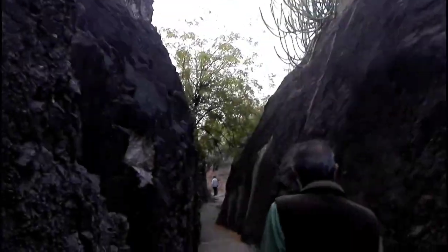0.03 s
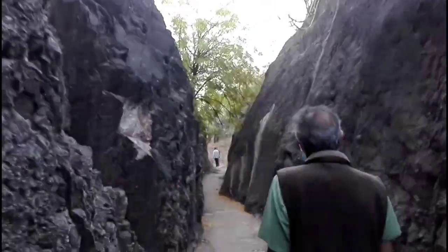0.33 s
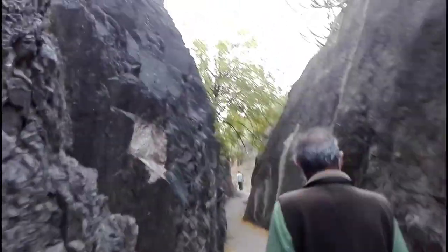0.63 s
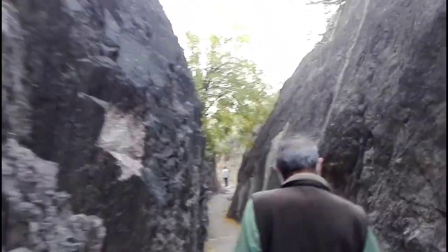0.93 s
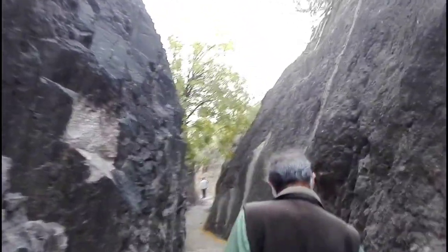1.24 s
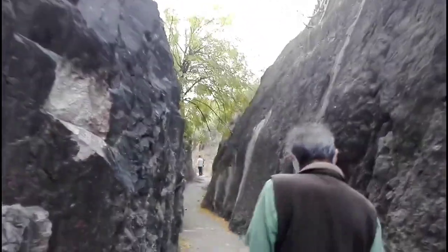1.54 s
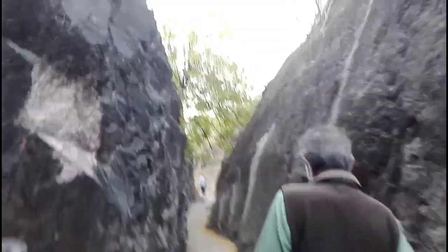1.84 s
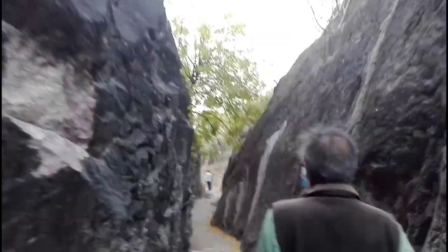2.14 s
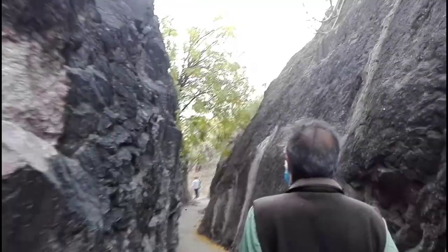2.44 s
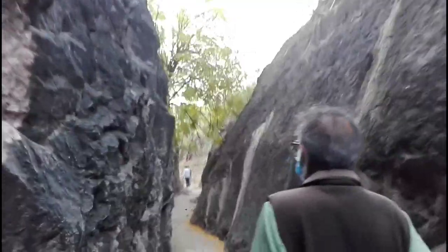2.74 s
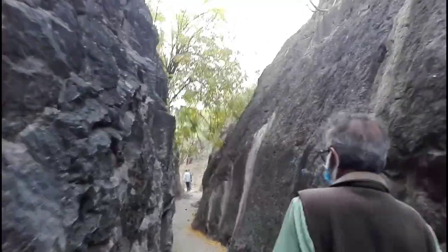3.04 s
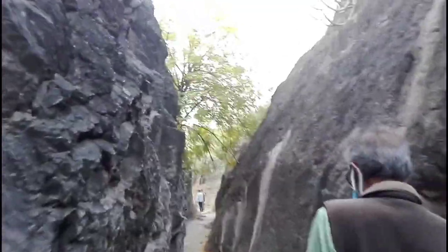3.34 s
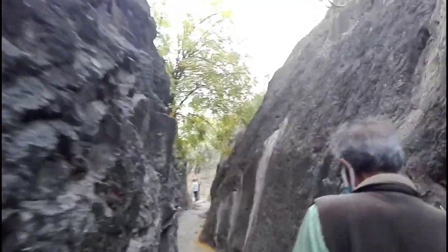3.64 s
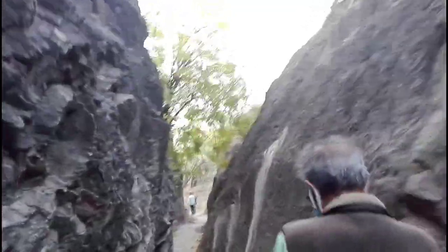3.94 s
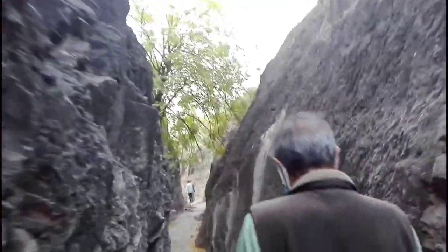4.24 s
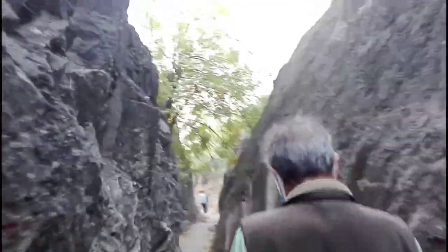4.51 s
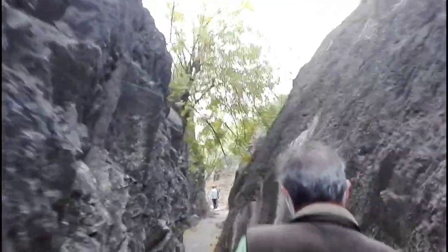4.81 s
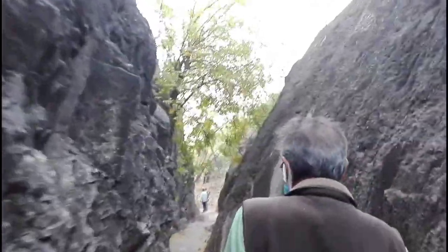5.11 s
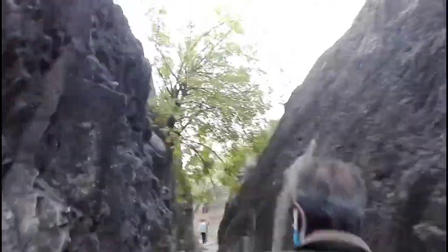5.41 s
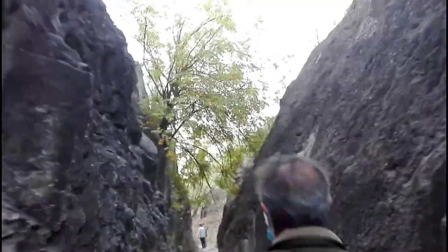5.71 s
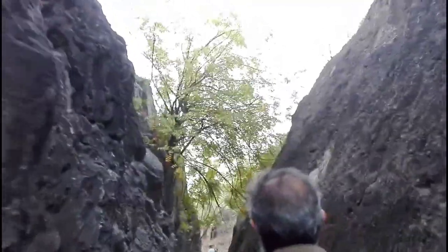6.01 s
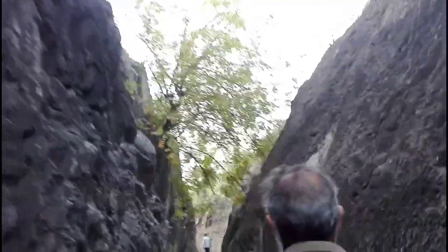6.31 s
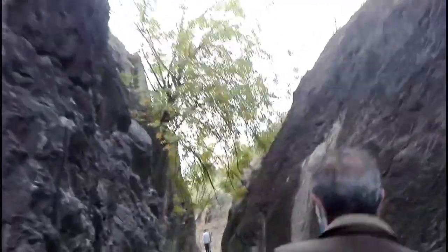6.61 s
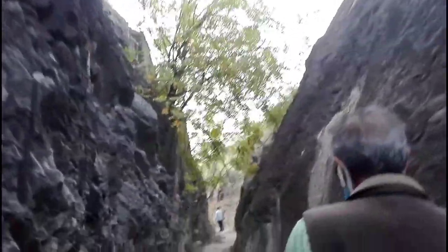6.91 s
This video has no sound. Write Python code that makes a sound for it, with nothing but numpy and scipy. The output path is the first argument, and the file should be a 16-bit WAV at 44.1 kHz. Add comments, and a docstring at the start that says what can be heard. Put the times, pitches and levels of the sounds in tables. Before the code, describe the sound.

A small bird repeats a high, slightly raspy three-note phrase between rock walls, over soft footsteps and one sharp knock on the microphone.

```python
"""A small bird repeats a three-note phrase in a narrow rock cleft: slurred whistle, falling chip,
two-voiced chirp. Its syrinx makes gliding tones that rasp where it vibrates unevenly, and the close
walls smear every note. Someone walks through with a camera: soft steps, crunching grit and, right at
the microphone, small handling ticks and one sharp knock on the housing.
Under it all lie a faint rumble of air and a distant hush."""
import sys
import numpy as np
from scipy import signal
from scipy.fft import rfft, irfft, next_fast_len
from scipy.io import wavfile
from scipy.ndimage import map_coordinates

SR = 44100
rng = np.random.default_rng(int(sys.argv[2]) if len(sys.argv) > 2 else 0)


def digitize_waveform(pressure):
    """Quantize a signal to 16-bit integers and store it at the path in sys.argv[1].

    Rows of a 2-D input are taken as channels; values are limited to [-1, 1].
    """
    field = np.atleast_2d(pressure).T
    bounded = np.clip(field, -1, 1)
    quanta = np.round(bounded * 32767).astype(np.int16)
    wavfile.write(sys.argv[1], SR, quanta)


N = 306747

# rasp spectrum of the chips and the opening call: f/Hz, relative density/dB
CHIP_RASP = [(700, -7.5), (1200, -17), (1800, 6.5), (2500, 7.5), (3200, 16), (3600, 5.5), (4200, -0.5),
             (5500, -37), (7000, -8.5), (8200, -56), (14000, -55.5)]
SLIDE_HZ, SLIDE_CURVE = 736, 1.45  # whistles and opening call end in a fall that gathers speed


def amp(db):
    """Decibels to gain."""
    return 10 ** (np.asarray(db) / 20)


def unit(x):
    """Scale to rms 1."""
    return x / np.sqrt(np.mean(x ** 2) + 1e-20)


def with_level(x, db, span):
    """Scale a sound so that its energy equals db held for span seconds."""
    return amp(db) * x / np.sqrt(np.sum(x ** 2) / (span * SR))


def along(points, hz):
    """Read (f/Hz, value) points on a log frequency axis."""
    f, values = np.transpose(points)
    return np.interp(np.log(hz + 1), np.log(f + 1), values)


def wobble(rate, size):
    """A smooth random curve, rate knots a second."""
    knots = rng.standard_normal(int(size * rate / SR) + 4)
    return map_coordinates(knots, [np.arange(size) * rate / SR])


def noise(spectrum, size):
    """Noise of rms 1, coloured by (f/Hz, relative density/dB) points."""
    m = next_fast_len(size)
    colour = amp(along(spectrum, np.fft.rfftfreq(m, 1 / SR)))
    return unit(irfft(rfft(rng.standard_normal(m)) * colour, m)[:size])


def add(track, s, sound):
    """Mix a sound into the track at s seconds."""
    part = track[max(round(s * SR), 0):][:len(sound)]
    part += sound[:len(part)]


def burst(t, attack, t60):
    """A quick rise and an exponential fall."""
    return (1 - np.exp(-t / attack)) * 1000 ** (-t / t60)


def bump(t, at, width):
    """A bell of height 1 around a moment."""
    return np.exp(-((t - at) / width) ** 2)


def swell(t, start, hold, attack, release):
    """A level in dB, 0 while held from start; attack and release are seconds per 20 dB."""
    return -20 * (np.maximum(start - t, 0) / attack + np.maximum(t - start - hold, 0) / release)


def switch(t, width):
    """A smooth change from 0 to 1 around t = 0."""
    return .5 + .5 * np.tanh(t / width)


def air(puff_width_s=.046, hiss_db=-76):
    """Air brushes the microphone in puffs, over a distant outdoor hush and a steady hiss."""
    # course of the rumble and of the hush: t/s, level/dB
    rumble_levels = [(0, -56.5), (3.5, -53), (5.3, -49.5), (6.3, -52.5), (6.96, -54)]
    hush_levels = [(0, -69.5), (1, -69), (2.5, -68), (5, -66), (6.3, -71), (6.96, -67)]
    # their spectra: f/Hz, relative density/dB
    rumble_spectrum = [(12, 2), (30, 0.5), (50, -5.5), (90, -13.5), (140, -21.5), (220, -41), (500, -68.5),
                       (1500, -92.5)]
    hush_spectrum = [(100, -0.5), (180, -5), (330, -9), (550, -17.5), (750, -16.5), (1100, -8.5),
                     (1500, -9.5), (1900, -18.5), (3000, -20.5), (14000, -43.5)]
    # puffs of air: t/s, lift of the rumble/dB
    puffs = [(.77, 11.5), (1.35, 7), (2.75, 6.5), (4.088, 12.5), (4.45, 6.5), (5.17, 1.5), (5.38, 5),
             (5.85, 6)]
    t = np.arange(N) / SR
    rumble_db = np.interp(t, *np.transpose(rumble_levels))
    hush_db = np.interp(t, *np.transpose(hush_levels))
    puff_db = sum(db * bump(t, s, puff_width_s) for s, db in puffs)
    rumble = amp(rumble_db + puff_db) * noise(rumble_spectrum, N)
    hush = amp(hush_db + 1.5 * wobble(18, N)) * noise(hush_spectrum, N)
    hiss = amp(hiss_db) * noise([(100, .47), (3000, .26), (7000, -.75), (14000, -1.1)], N)
    return rumble + hush + hiss


def cleft(x, wet_db, build_s=.0096, echoes_db=-3):
    """Direct sound, eight echoes off the close walls and a diffuse tail, new at each spot on the path."""
    # reverberation between the rock walls: f/Hz, t60/s
    decay_times = [(200, 0.38), (1500, 0.36), (2600, 0.33), (5300, 0.29), (8000, 0.28), (13000, 0.5)]
    hz, t, spectra = signal.stft(rng.standard_normal(SR // 2), SR, nperseg=256)
    envelope = burst(t, build_s, along(decay_times, hz)[:, None])
    _, tail = signal.istft(spectra * envelope, SR, nperseg=256)
    response = tail / np.linalg.norm(tail)
    delays = (rng.uniform(.003, .025, size=8) * SR).astype(int)
    response[delays] += amp(echoes_db) * rng.standard_normal(len(delays)) / np.sqrt(len(delays))
    response *= amp(wet_db)
    response[0] = 1  # the direct path
    return signal.fftconvolve(x, response)


def handling_ticks():
    """The camera housing ticks in the hand, right at the microphone: a snap with a faint tail."""
    # ticks: t/s, peak level/dB
    ticks = [(0.989, -40), (1.001, -41.5), (1.622, -39), (1.634, -39), (2.206, -31.5), (2.218, -37),
             (2.323, -29), (2.326, -24.5), (2.864, -37.5)]
    # colour of the housing: f/Hz, relative density/dB
    housing = [(150, -5.5), (600, -27.5), (1000, -4), (1500, 5), (2200, -0.5), (2800, -9.5), (4000, -13.5),
               (5500, -22.5), (9000, -57), (14000, -53)]
    out, t = np.zeros(N), np.arange(SR // 8) / SR
    envelope = burst(t, .0001, .007) + amp(-21) * burst(t, .002, .05)
    for s, db in ticks:
        tick = noise(housing, len(t)) * envelope
        add(out, s, amp(db) * tick / np.abs(tick).max())
    return out


def knock(at_s=2.3229, push_hz=88, settle_hz=42):
    """A knock on the housing gives the microphone one deep push, rings the case and settles."""
    # modes of the case: f/Hz, level/dB, t60/s
    modes = [(308, -47, 0.0623), (540, -31.5, 0.028), (680, -34, .028)]
    out, t = np.zeros(N), np.arange(SR // 8) / SR
    push = -amp(-2) * np.sin(2 * np.pi * push_hz * t) * bump(t, at=.0051, width=.0067)
    settle = amp(-23) * np.sin(2 * np.pi * settle_hz * t) * bump(t, at=.02, width=.015)
    ring = sum(amp(db) * burst(t, .00051, t60) * np.sin(2 * np.pi * hz * t) for hz, db, t60 in modes)
    add(out, at_s, push + settle + ring)
    return out


def contacts():
    """A foot rolls over heel, ball and toe; yields t/s, level/dB, hollow f/Hz, scrape/dB, t60/s."""
    # footfalls: t/s, heel level/dB, roll to the ball/s, ball level/dB, ball f/Hz, relative scrape/dB
    steps = [(.51, -51.5, .094, -45, 185, -4.5), (1.189, -53, 0.058, -52.5, 240, -7),
             (1.946, -53.5, 0.025, -46, 290, -6), (2.624, -53, 0.069, -53, 393, -1.5),
             (3.237, -45.5, 0.049, -59, 393, 10.5), (3.473, -48.5, 0.051, -52.5, 290, -7),
             (3.976, -50, 0.06, -58.5, 183, -11), (4.234, -44, 0.056, -49, 349, -9),
             (4.506, -50.5, 0.065, -81, 260, -8), (4.761, -52, .082, -51.5, 303, 11),
             (5.001, -43, 0.048, -63, 200, -10), (5.205, -54.5, 0.048, -63, 248, 11),
             (5.621, -47.5, 0.085, -45.5, 345, -0.5), (6.435, -53, 0.064, -48, 167, -8)]
    for s, heel_db, roll_s, ball_db, ball_hz, scrape_db in steps:
        yield s, heel_db, 181, scrape_db, .09  # the heel lands short and firm
        yield s + roll_s, ball_db, ball_hz, scrape_db, .13
        yield s + roll_s + .055, ball_db - 8.5, 308, scrape_db, .24  # the toe pushes off, softer


def footsteps(pat_db=-2):
    """Below the microphone, each contact of a sole makes a thud, an unsteady hollow ring and a scrape."""
    # spectra of thud and scrape: f/Hz, relative density/dB
    sole_spectrum = [(60, -43), (140, 10.5), (200, 6), (320, -8.5), (550, -9.5), (900, -64), (2000, -68)]
    scrape_spectrum = [(200, -2), (450, -7), (850, 8), (1400, 0), (2400, -7), (6000, -21), (14000, -49)]
    out, t = np.zeros(N), np.arange(SR // 3) / SR
    for s, db, hz, scrape_db, t60 in contacts():
        scrape = unit(noise(scrape_spectrum, len(t)) * amp(4.5 * wobble(220, len(t))))
        hollow_hz = hz * (1 + .23 * wobble(300, len(t)))
        hollow = np.sqrt(2) * np.sin(2 * np.pi * np.cumsum(hollow_hz) / SR)
        pat = noise(sole_spectrum, len(t)) + hollow
        contact = burst(t, .0029, t60) * (amp(pat_db) * pat + amp(scrape_db) * scrape)
        add(out, s, with_level(cleft(contact, wet_db=-7.5), db, span=t60 / 14))
    return out


def grit(trickle_after_s=.039, trickle_db=-15, trickle_t60=.2):
    """Grit cracks underfoot in uneven clumps; loosened grains settle after each crack."""
    # cracks: t/s, level/dB, centre f/Hz, t60/s
    cracks = [(1.309, -48.5, 1630, 0.1), (1.373, -46.5, 1150, 0.12), (2.124, -42, 1390, 0.036),
              (2.622, -45.5, 1190, 0.087), (3.238, -37, 4170, 0.11), (4.505, -49.5, 3940, 0.14),
              (5.212, -46, 5440, 0.045), (6.564, -53.5, 1134, 0.39)]
    out, t = np.zeros(N), np.arange(SR // 3) / SR
    for s, db, hz, crack_t60 in cracks:
        colour = [(hz / 6, -28), (hz / 2, -9), (hz, 0), (hz * 2, -12), (hz * 5, -38)]
        crack = (s, db, crack_t60)
        trickle = (s + trickle_after_s, db + trickle_db, trickle_t60)
        for onset, level, t60 in (crack, trickle):
            grains = noise(colour, len(t)) * amp(2.4 * wobble(500, len(t)))
            heard = cleft(burst(t, .001, t60) * grains, wet_db=-9)
            add(out, onset, with_level(heard, level, span=t60 / 16))
    return out


def second_voice(t, hz, db, octave_db=-23):
    """The other side of the syrinx holds a brief, nearly level tone."""
    phase = 2 * np.pi * np.cumsum(hz * (1 + .009 * wobble(250, len(t)))) / SR
    gate = np.exp(-((t - .021) / .021) ** 4)
    return amp(db) * gate * (np.sin(phase) + amp(octave_db) * np.sin(2 * phase))


def syrinx(notes, t, pitch, tone_db, overtone_db, rasp_db, rasp_spectrum, rough, halving):
    """A gliding tone, rasping where the syrinx vibrates unevenly (rough, 0-1), heard through the cleft."""
    # harmonics of the syrinx: multiple of the pitch, relative level/dB
    harmonics = [(1, 0), (2, -12.5), (3, -13.5), (4, -34), (5, -46.5)]
    # response of the throat: f/Hz, gain/dB
    throat = [(1500, -1), (3000, -3.5), (4200, 0), (5200, -0.5), (6500, 0), (8000, -12.5), (9300, -10),
              (10700, 2), (14000, 2.5)]
    out = np.zeros(N)
    for s, db, pitch_ratio, rasp_gain_db, *second in notes:
        jitter = .075 * rough * wobble(600, len(t))
        waver = .005 * wobble(45, len(t))
        hz = pitch * pitch_ratio * (1 + jitter + waver)
        phase = 2 * np.pi * np.cumsum(hz) / SR
        tone = sum(amp(level + along(throat, k * hz) + overtone_db * (k > 1)) * np.sin(k * phase)
                   for k, level in harmonics)
        tone *= 1 + halving * rough * np.sin(phase / 2)  # strong and weak cycles alternate when hoarse
        rasp = amp(rasp_db + rasp_gain_db) * noise(rasp_spectrum, len(t)) / np.sqrt(2)
        voice = amp(tone_db) * tone + rasp
        if second:
            voice += second_voice(t, *second)
        heard = cleft(voice * signal.windows.tukey(len(t), .08), wet_db=3.5)
        add(out, s + t[0], with_level(heard, db, span=.1))
    return out


def opening_call(held_hz=2540, lead_s=.012, hold_s=.066, slide_s=.06):
    """Both sides of the syrinx sound: a burst of rasp, then the hoarse tone swells and slides down."""
    # the call: t/s, level/dB, pitch ratio, rasp gain/dB, second voice f/Hz, its relative level/dB
    notes = [(1.392, -47, 0.95, 4, 3104, 1)]
    t = np.arange(-lead_s, hold_s + slide_s, 1 / SR)
    slide = np.maximum(t - hold_s, 0) / slide_s
    pitch = held_hz - SLIDE_HZ * slide ** SLIDE_CURVE
    dip_db = 7 * bump(t, at=.035, width=.021)
    tone_db = 4 + swell(t, start=.065, hold=.043, attack=.17, release=.021) - dip_db
    rasp_db = -1 + swell(t, start=0, hold=.0065, attack=.013, release=.17) - dip_db
    return syrinx(notes, t, pitch, tone_db, overtone_db=-6, rasp_db=rasp_db,
                  rasp_spectrum=CHIP_RASP, rough=.79, halving=.096)


def chirps(low_hz=1888, sag_hz_per_s=7430, lead_s=.02, length_s=.1, overtone_db=-14):
    """A low sagging tone dies under a second voice, while the rasp dips and swells again."""
    # chirps: t/s, level/dB, pitch ratio, rasp gain/dB, second voice f/Hz, its relative level/dB
    notes = [(1.175, -65, 0.44, 35, 3510, 25.5), (1.68, -58.5, 0.94, 17, 3360, 8.5),
             (2.24, -50.5, .98, 13, 2870, 9), (2.775, -50.5, 1.036, 5.5, 2895, -2),
             (3.295, -47.5, 0.99, 10, 2874, 7), (3.825, -53.5, 1, 7.1, 3050, -6),
             (4.38, -50, .99, 7.5, 2790, 8), (4.94, -52.5, .97, 6.6, 2893, -1),
             (5.522, -50, 0.92, 3.9, 2850, 7), (6.105, -54, 0.95, 6.1, 3036, -2.5)]
    # their rasp: f/Hz, relative density/dB
    rasp_spectrum = [(900, -36), (1400, -15), (1750, -11), (2400, -14), (2900, -2), (3300, 0), (3600, -4),
                     (4100, -19), (5200, -24), (6200, -20), (7200, -17), (8200, -29), (14000, -42)]
    t = np.arange(-lead_s, length_s, 1 / SR)
    pitch = low_hz - sag_hz_per_s * t
    tone_db = 8 + swell(t, start=-.0094, hold=.019, attack=.013, release=.034)
    rasp_db = -5 + swell(t, start=.0013, hold=.028, attack=.019, release=.11)
    rasp_db -= 9 * bump(t, at=.034, width=.016)
    return syrinx(notes, t, pitch, tone_db, overtone_db, rasp_db, rasp_spectrum, rough=1, halving=.12)


def chips(low_hz=2161, flip_hz=1056, sag_hz_per_s=8500, lead_s=.022, length_s=.05):
    """A burst of rasp in the high register flips down to a louder, purer tone that sags."""
    # chips: t/s, level/dB, pitch ratio, rasp gain/dB
    notes = [(1.735, -54, 0.89, -1), (2.13, -51, .93, 0.5), (2.645, -48, 0.96, 1), (3.17, -45.5, 0.99, -4),
             (3.7, -48, .97, 1), (4.24, -47.5, .94, 2.3), (4.8, -48, 0.9, 1.5), (5.385, -51.5, 0.96, -1),
             (5.958, -50.5, .93, -1.5)]
    t = np.arange(-lead_s, length_s, 1 / SR)
    high = switch(.002 - t, .0066)
    pitch = low_hz + flip_hz * high - sag_hz_per_s * t
    tone_db = 11 + swell(t, start=.0069, hold=.0062, attack=.021, release=.052)
    overtone_db = -16 + 11 * high
    rasp_db = 2 + swell(t, start=-.012, hold=.002, attack=.011, release=.065)
    return syrinx(notes, t, pitch, tone_db, overtone_db, rasp_db, CHIP_RASP, rough=.6, halving=.081)


def whistles(held_hz=2642, scoop_hz=510, step_hz=51.8, droop_db_per_s=19.5):
    """A hoarse lead-in locks on, steps up and brightens at a break, then slides down rough and dull."""
    # whistles: t/s, level/dB, pitch ratio, rasp gain/dB
    notes = [(1.88, -41.5, 0.98, 1.5), (2.387, -39.5, 1.001, 2.5), (2.916, -39, 1.004, 1.5),
             (3.44, -38.5, 1.01, 2), (3.982, -37.5, 1.006, 2.5), (4.538, -37.5, 1.003, 0),
             (5.126, -38.5, 0.99, 1.5), (5.7, -39, 0.99, 3.3)]
    # their rasp: f/Hz, relative density/dB
    rasp_spectrum = [(700, -57), (1100, -7.5), (1400, 0.5), (1800, -8.5), (2400, 3.5), (3100, 5), (3700, 3),
                     (4300, -1.5), (4900, -10.5), (6200, -9), (7300, -13.5), (9000, -44), (14000, -59)]
    lead_s, break_s, hold_s, slide_s = .048, .0517, .072, .053
    t = np.arange(-lead_s, hold_s + slide_s, 1 / SR)
    hoarse, stepped = switch(-t, .002), switch(t - break_s, .003)
    scoop = np.maximum(-t, 0) / lead_s
    slide = np.maximum(t - hold_s, 0) / slide_s
    pitch = held_hz + scoop_hz * scoop + step_hz * stepped - SLIDE_HZ * slide ** SLIDE_CURVE
    effort_db = swell(t, start=-.036, hold=.14, attack=.027, release=.022)
    effort_db -= droop_db_per_s * t  # the voice tires
    break_db = 16.5 * bump(t, at=.046, width=.0105)
    tone_db = 3.75 + effort_db - 16.5 * hoarse - break_db
    overtone_db = -3 + 5 * stepped - 17 * slide
    rasp_db = -13 + swell(t, start=-.028, hold=.01, attack=.024, release=.15) - 14 * slide
    rough = .035 + .65 * hoarse + .72 * slide
    return syrinx(notes, t, pitch, tone_db, overtone_db, rasp_db, rasp_spectrum, rough, halving=.057)


def scene():
    """The bird and the walk through the cleft, at the camera's one microphone."""
    bird = opening_call() + whistles() + chips() + chirps()
    return (bird + footsteps() + grit() + handling_ticks() + knock() + air())[None]


def record(dry):
    """The camera keeps nothing above its band limit."""
    top_hz = 14320
    m = next_fast_len(N + SR // 2)
    passband = np.fft.rfftfreq(m, 1 / SR) < top_hz
    return irfft(rfft(dry, m) * passband, m)[..., :N]


dry = scene()
out = record(dry)
digitize_waveform(out)
```